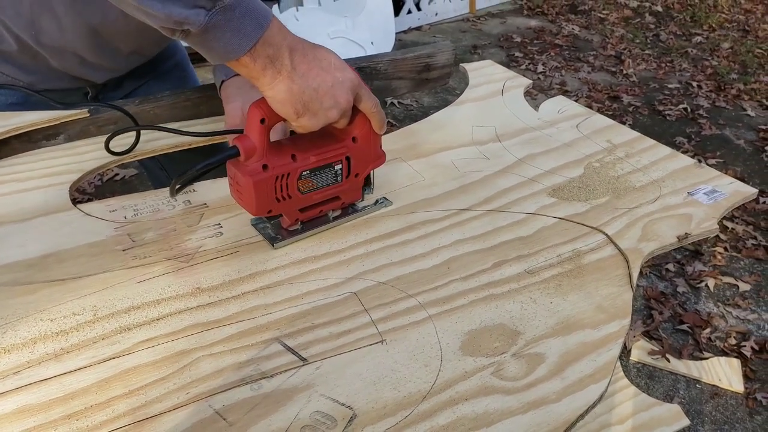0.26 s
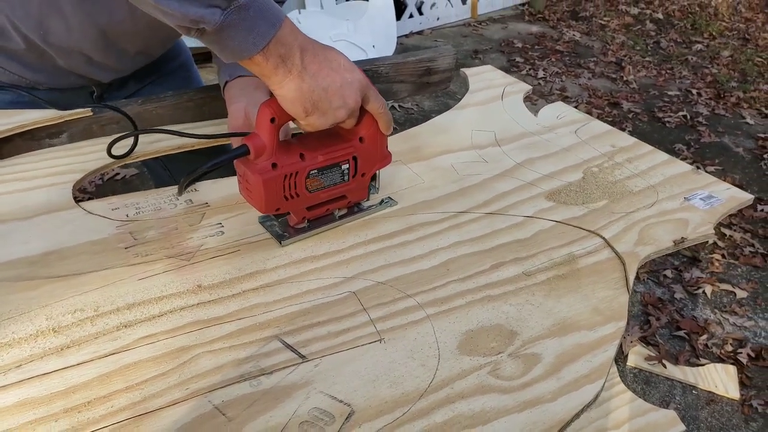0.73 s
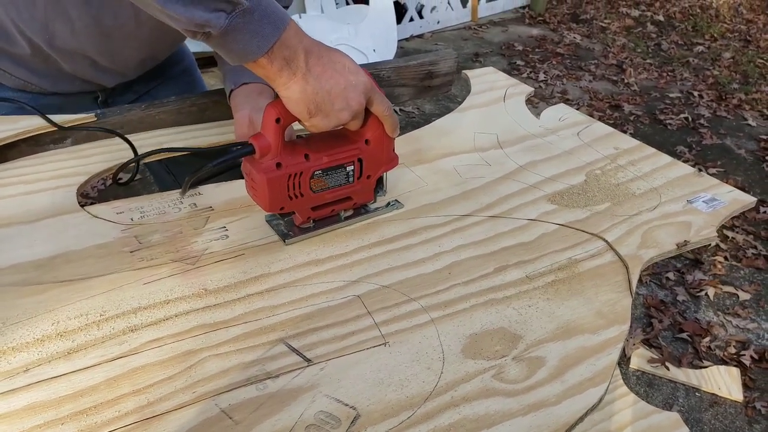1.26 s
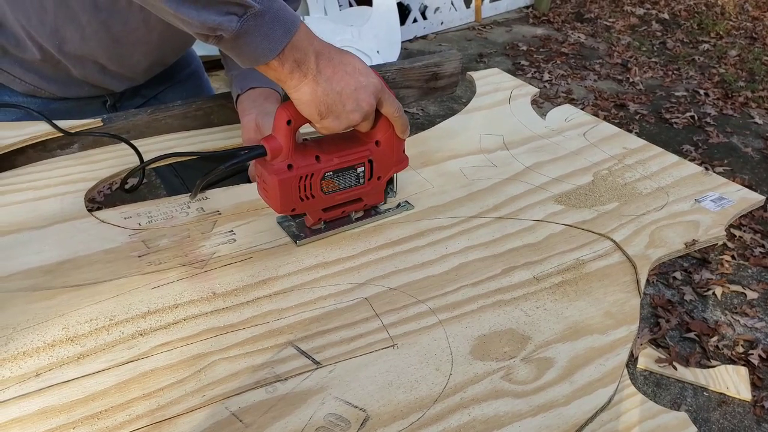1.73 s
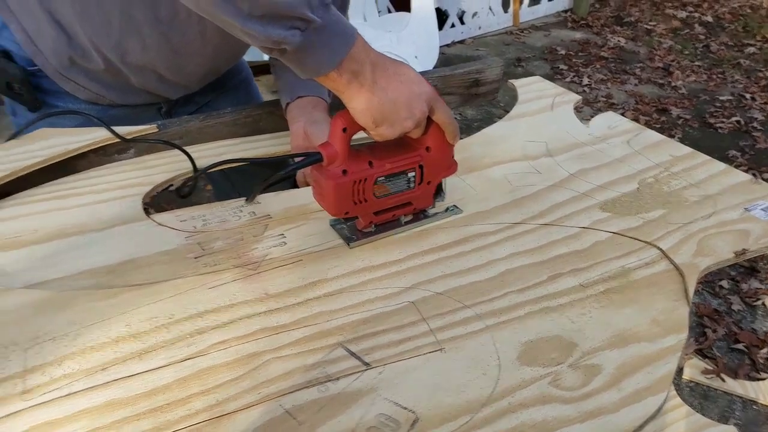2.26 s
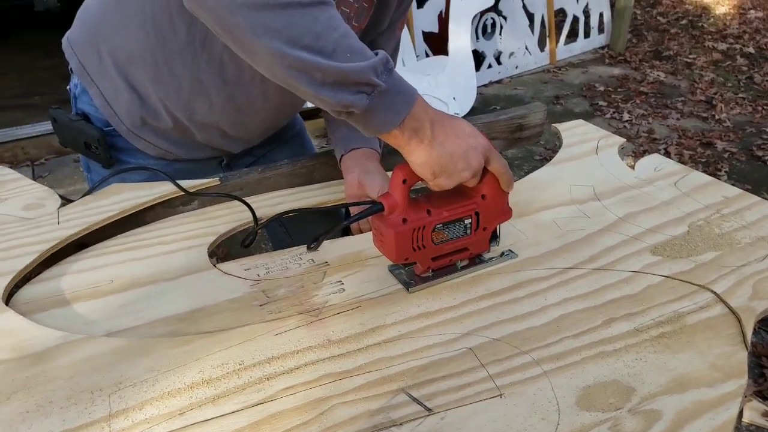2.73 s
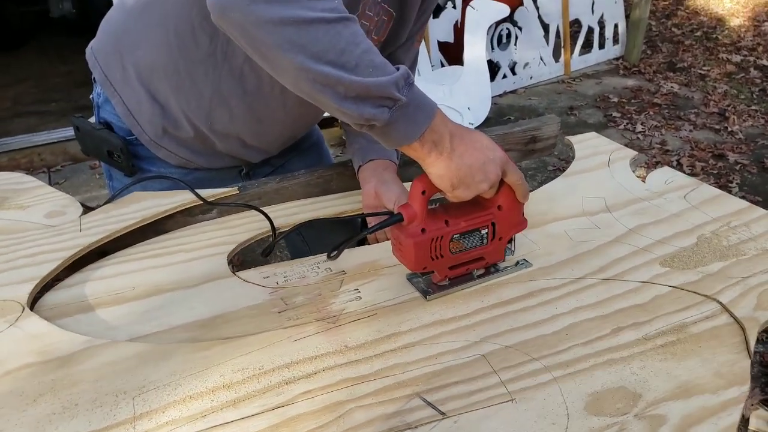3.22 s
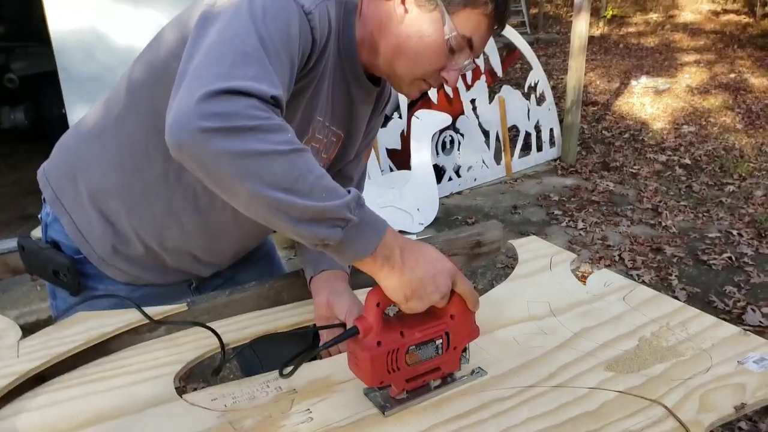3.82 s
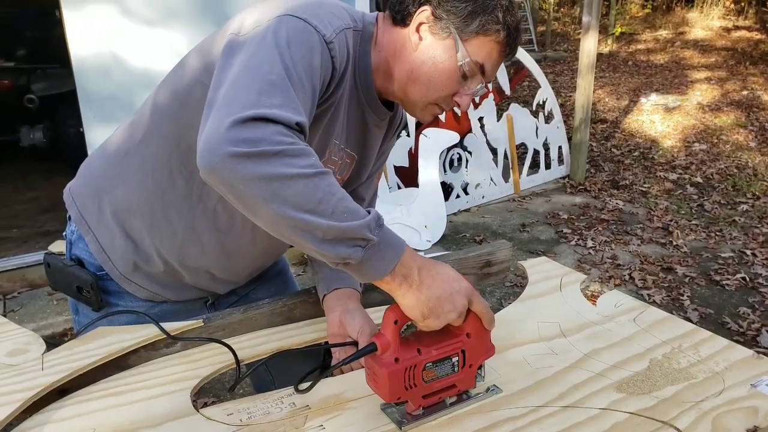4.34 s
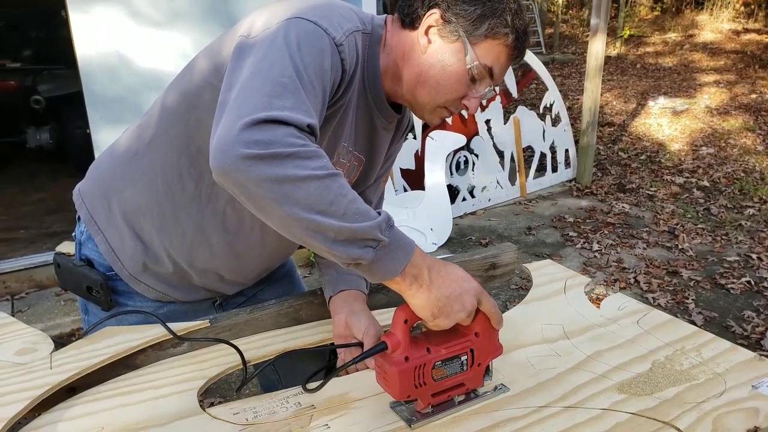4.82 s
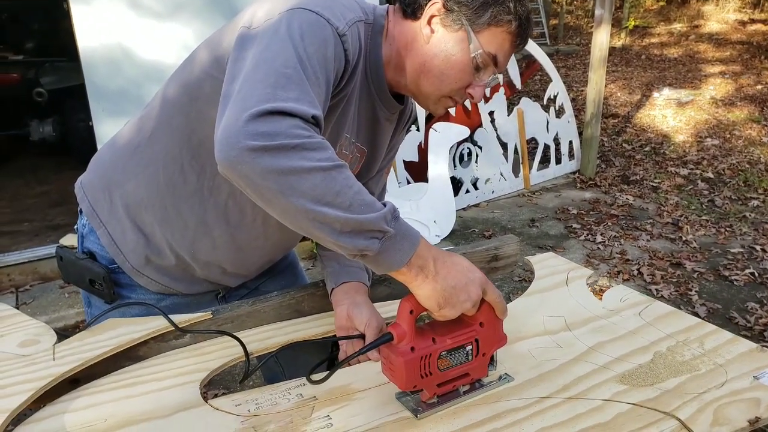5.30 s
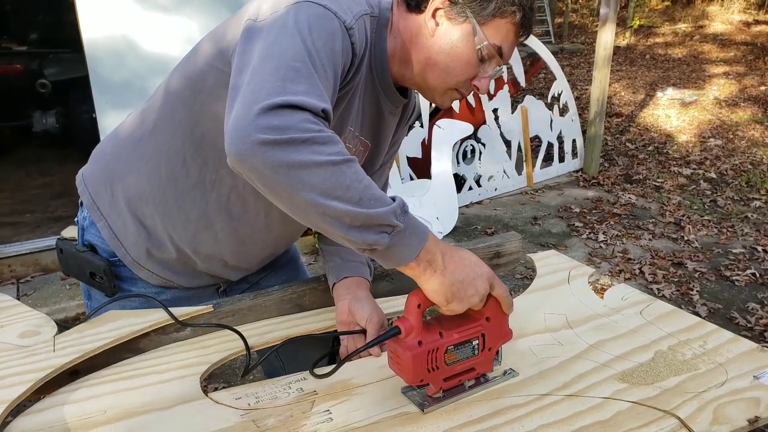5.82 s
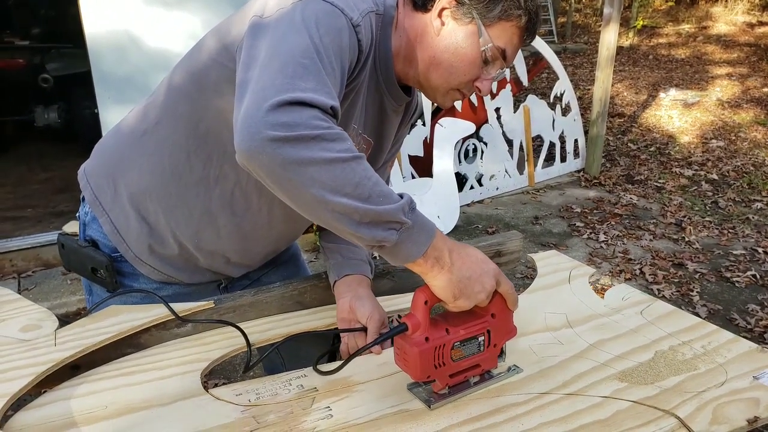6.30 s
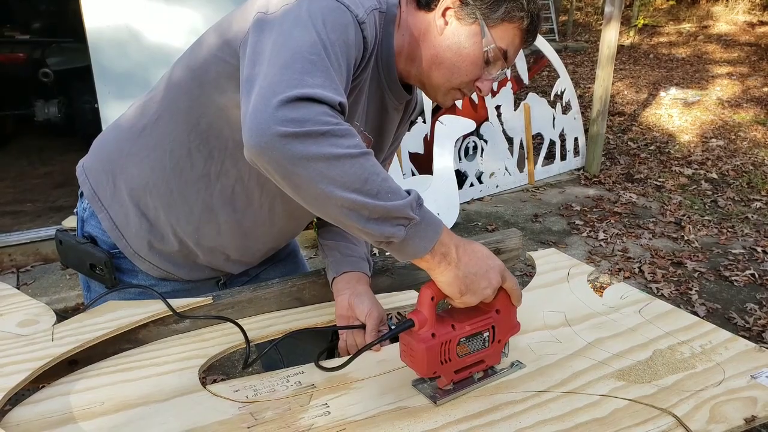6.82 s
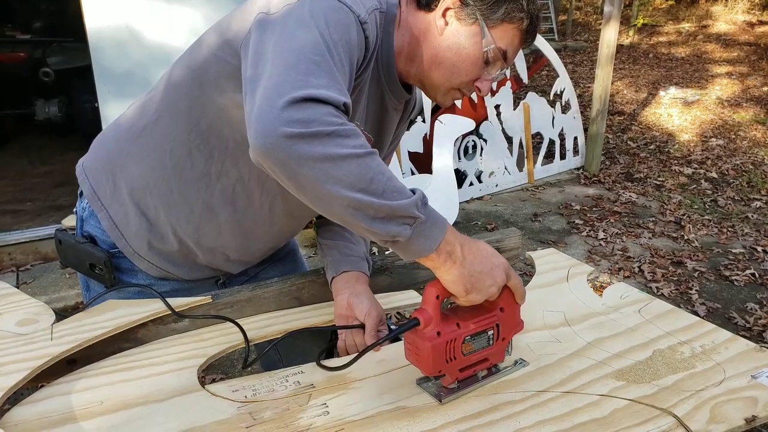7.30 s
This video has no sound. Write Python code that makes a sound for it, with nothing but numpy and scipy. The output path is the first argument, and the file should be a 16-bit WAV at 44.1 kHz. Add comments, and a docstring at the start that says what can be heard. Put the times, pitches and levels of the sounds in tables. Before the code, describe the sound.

Outdoors, close to a hand-held stereo microphone, a corded jigsaw is already cutting plywood. A steady motor and gear whine sits inside a rough, rapid rattling roar with bright fan hiss. At half a second the blade binds and the wooden sheet rumbles and slaps harder. After two seconds the sound shifts and drops a few decibels, then stays steady, with a milder bind near four seconds.

```python
"""A corded jigsaw cuts a plywood sheet outdoors, close to a hand-held camera.
From the start the motor shaft and crank gears whine, chips and blade knocks make the casing roar and
the plywood ring, the fan hisses and faint air puffs. At about 0.5 s the blade binds and the sheet rumbles.
After two seconds the camera swings away, shifting every layer's level or tone; near 3.8 s the blade binds
again, more gently. Tones are wavering cosines; the other sounds are mostly filtered noise."""
import sys
import numpy as np
from scipy import signal
from scipy.fft import rfft, irfft, next_fast_len
from scipy.io import wavfile
from scipy.ndimage import uniform_filter1d, map_coordinates

SR = 44100
rng = np.random.default_rng(int(sys.argv[2]) if len(sys.argv) > 2 else 0)


def dump_mix(stems):
    """Bounce the given channels to the path in sys.argv[1] as a 16-bit WAV at rate SR."""
    frames = np.atleast_2d(stems).T  # one column per channel
    limited = np.clip(frames, -1, 1)  # hard clip at full scale
    pcm = np.round(limited * 32767).astype(np.int16)
    wavfile.write(sys.argv[1], SR, pcm)


N = 332955

# "Near, swinging, far" are the three camera views. Levels are relative: layers may add an overall level.
# camera path: [t/s, view (0 near, 1 swinging, 2 far)]
VIEW = [(0, 0), (2.2, 0.15), (2.5, 0.95), (3.5, 1.25), (4.2, 2), (7.55, 2.013)]
# saw speed, sagging under load: [t/s, strokes per second]
STROKE_SPEED = [(0, 53.81), (.4, 53.77), (.72, 52.8), (.97, 52.95), (1.22, 53.68), (1.8, 53.88),
                (2.3, 53.81), (2.7, 53.62), (3.25, 53.17), (3.8, 52.46), (4.05, 52.4), (4.6, 53),
                (5.05, 53.2), (5.75, 53.02), (6.1, 53.13), (7.55, 53.48)]
# shared level of casing and fan: [t/s, level/dB]
LOUDNESS = [(0, -17), (.6, -16.5), (1.05, -17), (2.05, -16.5), (2.7, -19), (3.2, -21.5), (3.9, -21.5),
            (4.35, -23.5), (5, -21.5), (5.6, -21.5), (7.55, -21.5)]
# times when the blade binds: [start t/s, end t/s, grip at the start/dB]
BITES = [(0.51, 0.95, -1.5), (3.83, 4.225, -6.5)]

# motor whine: [shaft order, level near/dB, swinging/dB, far/dB, lift while binding/dB]
WHINE = [(1, -36.5, -38.5, -39.5, -0.5), (4, -23.5, -27, -31, -2), (8, -36, -27.5, -27, -4)]
# wavering tones in step with the slap: [stroke order, near/dB, swinging/dB, far/dB, lift while binding/dB]
CHATTER = [(5, -56.5, -64.5, -47, 19.5), (14, -43, -37.5, -36.5, 3), (15, -38, -40.5, -37.5, 0),
           (16, -66, -50, -44, -1), (19, -34, -42, -51.5, 5), (20, -44, -58, -61, -3),
           (21, -41, -37, -55, 2.5), (25, -60, -51, -54, 4)]
# other gear and stroke tones, wavering freely, where shaft order 5 is the gear mesh:
# [shaft order, stroke order to add]
TONE_ORDERS = [(0, 3), (0, 6), (0, 7), (0, 8), (0, 11), (0, 12), (0, 13), (0, 17), (0, 22), (0, 39),
               (1, -2), (1, -1), (1, 1), (1, 2), (1, 3), (1, 4), (1, 5), (2, 0), (2, 1), (3, 0), (5, -3),
               (5, -2), (5, -1), (5, 0), (5, 2), (5, 7), (6, -2), (6, 0), (12, 0)]
# one row per row of TONE_ORDERS: [level near/dB, swinging/dB, far/dB]
TONE_LEVELS = [(-44.5, -47.5, -47.5), (-73, -62, -51.5), (-50, -53.5, -52), (-59, -76, -68),
               (-41.5, -47, -52.5), (-58, -49, -52), (-38, -43, -64), (-46, -59, -51), (-56, -42, -47.5),
               (-33.5, -45, -45), (-57, -56, -59), (-48, -57, -63), (-44, -50, -60), (-49, -48, -83),
               (-60, -55, -75), (-42, -45, -66), (-34, -48, -44), (-36.5, -46, -46), (-37, -70, -49.5),
               (-39.5, -51, -38.5), (-31.5, -53, -40), (-62, -59, -37.5), (-37, -37, -64), (-35, -57, -90),
               (-35, -32, -50), (-49, -45, -46), (-35.5, -40, -36.5), (-40, -33, -37), (-46, -52, -45.5)]
# extra tones while the blade binds: [stroke order], and for each its [level/dB]
SHAKE_ORDERS = (2, 4, 6, 8, 22, 25)
SHAKE_LEVELS = [-47.5, -49, -46, -54, -38, -42]
# tones that swell or fade for a while: {nearest stroke order: [centre t/s, length/s, lift/dB]}
SWELLS = { 5: [(1.1, 0.22, 6), (3.35, 0.84, 9), (4.36, 0.37, -19)], 9: [(.12, 1.2, -4), (3.4, 1.3, -5.5),
          (4.36, 0.2, -6), (4.65, 1.5, -12), (5.8, 1.4, -0.5)], 7: [(1.15, 0.22, -3), (3.2, .45, -14),
          (4.87, 0.4, -9), (7.2, 0.97, -6)], 10: [(.7, .5, -9), (2.1, 1, 6.5)], 11: [(.2, 0.46, -10),
          (2.55, 0.46, 7), (3.4, 0.92, -19), (4.45, 0.43, 8.5)], 14: [(1.12, .22, -10), (1.76, .4, -8),
          (2.62, 0.2, -1), (3.65, 0.35, 3.5)], 15: [(.2, .65, -12), (.97, 0.35, 8.5), (3.55, 0.4, -6),
          (4.75, 0.79, 4.5), (5.52, 0.82, 11.5), (6.02, .45, 3.5)], 19: [(.45, .45, 2.3), (3.55, .8, 6.8),
          (4.6, 1.3, 4.2), (5.62, .4, 8.5)], 20: [(.2, 0.49, 8.1), (.76, 0.5, 11), (1.15, .3, 3.6),
          (2.12, .25, 4), (5.7, .4, 8)], 21: [(.8, 1.3, 10), (3.65, 0.55, -13), (5.1, 1.9, 7)],
          25: [(5.52, 0.49, 10), (6.62, .25, 9)], 37: [(2.55, 0.59, -4), (7.45, .7, -0.5)],
          74: [(.12, .55, 2.5), (2.02, .55, -6), (3.9, 0.74, -9)]}

# colour of the casing roar: [f/Hz, near/dB per Hz, swinging/dB per Hz, far/dB per Hz]
CASING_COLOUR = [ (130, -47, -32.5, -32.5), (238, -44, -30, -22.5), (295, -34, -29, -17.5),
                 (366, -25, -25, -16.5), (650, -11.5, -11.5, -17), (1190, -15.5, -19.5, -12.5),
                 (1620, -11, -10.5, -7.5), (1847, -9.5, -7, -5), (2080, -3.5, -3, -3), (3100, -8, -2.5, -3),
                 (3850, -8.5, -3.5, -4.5), (4130, -8, -14.5, -12.5), (4920, -12, -10.5, -11),
                 (5580, -14, -16, -14), (6700, -18.5, -17, -18), (10000, -29, -28, -35)]
# casing resonances: [f/Hz, width/Hz, lift near/dB, swinging/dB, far/dB]
CASING_MODES = [(1260, 126, 3, 12.3, 7.6), (1464, 84, 6.5, 6.5, 4.3), (3300, 280, 4.5, 0.89, 0.1),
                (3800, 550, -6.5, 1.4, 3.6), (5090, 260, -3, .1, 5.2)]
# two drifting bright bands, low in the casing and high in the fan: [t/s, low f/Hz, lift/dB, high f/Hz, lift/dB]
GLIDE = [ (0, 2300, 1.2, 10700, 2.4), (1, 2390, 5.4, 11000, 2.9), (2.2, 2470, 6.3, 12500, 5.2),
         (2.45, 2420, 3.2, 12000, 1), (3, 2550, 6.4, 12700, 1.9), (3.6, 2750, 3.7, 13000, 1.9),
         (4.2, 2880, 4.6, 12400, 0.77), (7.55, 3130, 1.8, 11800, 1.2)]
# bands of the casing roar that flare or sink for a moment: [centre t/s, length/s, f/Hz, width/Hz, lift/dB]
FLARES = [(2.35, 0.17, 2200, 1400, -2), (2.08, 0.36, 3340, 310, 2.5), (1.87, 0.12, 2900, 390, 6),
          (2.52, 0.094, 2480, 490, 7.5), (2.8, 0.28, 2650, 400, 2.5), (1.65, 0.35, 2800, 600, -2),
          (5.3, 0.84, 2650, 400, 1.5), (6.2, 0.061, 2850, 960, 2.5), (7.1, 0.3, 3100, 600, 2.5),
          (5.4, 0.15, 2800, 500, -0.5), (5.55, 0.51, 1300, 260, 4)]

# plywood modes: [f/Hz, width/Hz (widened when filtering), delay after the slap/ms, slap lift/dB]
SHEET_MODES = [(1087, 280, -0.45, -1.3), (793, 194, -0.4, 0), (1366, 190, 2.5, 3)]
# one row per plywood mode: [level near/dB, swinging/dB, far/dB]
SHEET_LEVELS = [(-24, -27, -37.5), (-34, -32, -26), (-41, -42, -36)]
# slaps given a set strength, strong or weak: [t/s, lift/dB]
SET_SLAPS = [(.041, 4), (.136, -6), (.265, 9), (.468, 12), (.502, 13), (.521, 12), (.54, 14), (.558, 2),
             (.672, 4), (.69, 12), (.709, 9), (.785, 1), (.804, 12), (.823, 0), (.86, 3), (.898, 14.5),
             (1.012, 12), (1.03, 14), (1.295, 0), (1.39, 10), (1.574, 10), (1.666, 5), (1.847, 7),
             (1.883, 2), (1.955, 6), (2.01, 11), (2.11, 11), (2.147, 8), (2.184, 6), (3.006, 6), (4.591, 8),
             (4.91, 6), (4.95, 8), (5.106, 7), (5.178, -1), (5.495, 9), (5.533, 10), (5.646, 10),
             (5.836, 4), (5.857, 8), (6.082, 6), (6.292, 7), (6.44, 7), (6.59, 2), (7.21, 4), (7.395, 9),
             (7.5, 11)]
# colour of the rumble while binding: [f/Hz, level/dB per Hz]
THUD = [(30, -30), (70, -21), (120, -2), (350, 5), (700, -21), (1500, -60)]

# colour of the fan hiss: [f/Hz, near/dB per Hz, swinging/dB per Hz, far/dB per Hz]
FAN_COLOUR = [ (4000, -55, -45, -42), (7320, -11.5, -2, -5), (8500, -2.5, 5.5, 5), (8900, -1, 2, 1.5),
              (10700, -2.5, 0, 2), (11600, 0.5, 1.5, 1.5), (13000, -2.5, 3, 1), (14500, -1, -7, -1),
              (15600, -4, -1, -9)]
# fan level added to LOUDNESS: [near/dB, swinging/dB, far/dB]
FAN_LEVELS = (-5.5, -8, -5.5)
# colour of the breeze: [f/Hz, level/dB per Hz]
GUST = [(20, -23), (60, -20), (100, -15.5), (140, -3), (220, -15), (600, -70)]
# level of the breeze: [near/dB, swinging/dB, far/dB]
BREEZE_LEVELS = (-50.5, -57, -56.5)
# puffs of breeze: [centre t/s, length/s, lift/dB]
PUFFS = [(.25, .5, 4), (.7, 0.29, 4), (1.104, .1, 6), (1.983, 0.26, 4), (2.206, .1, 11), (2.4, 0.14, 7),
         (2.94, .08, 6), (3.85, .2, 9), (5.45, .1, 8)]

# the two sound ports: [f/Hz, left over right near/dB, far/dB, likeness near (0-1), far (0-1)]
PORTS = [ (60, 16, -6, 0.56, 0.28), (160, 1.5, 1, 0.95, 0.43), (760, -2.5, -3, 0.76, 0.57),
         (1060, -3, -2, 1, 0.49), (1790, -1.5, -0.5, 0.13, 0.26), (2090, -2, -0.5, 0.41, 0.55),
         (3100, -1, -3.5, 0.23, 0.94), (3710, -8.5, -3, 0.18, 0.75), (4100, -2.5, -11.5, 0.45, 0.091),
         (4860, -4.5, -7, 0.072, 0.63), (7340, -4, -7, 0.046, 0.13), (9100, -1.5, 0, 0.31, 0.33),
         (11500, -2.5, -3, 0.45, 0.28), (15000, -1, 0, 0.99, 0.27)]
# how far the left port leads the right, near and then far: [f/Hz, lead/rad]
LEAD_NEAR = [(0, 0.5), (1000, 0.46), (1600, 1.5), (2000, 0.86), (2600, 1.73), (3300, 0.5), (4000, -1.1),
             (5000, 3), (9000, -1), (15000, 3)]
LEAD_FAR = [(0, 1), (1400, -0.66), (2000, -1.81), (3000, -2), (4000, -3), (4700, -8.5), (5100, -8.5),
            (7500, -7), (9000, -8.5), (12000, -10.5), (15000, -11.5)]

GEAR = 46 / 5  # shaft turns per stroke: 46-tooth crank gear over five-tooth pinion
FLUTTER_DB = 0.5  # fast whine flutter at shaft order 1; higher orders flutter more
SLAP_LEAD = 0.052  # chatter leads the whole stroke by this share of a stroke
KNOCK_AT, SECOND_HARDER_DB = .06, 1.6  # first knock (share of a stroke), extra strength of the second
MID_KNOCK = .35  # size of the lighter tick as the crank passes mid travel
SHEET_BIND_DB = 0.5  # binding rings the sheet harder
FRAME = 1024  # samples per filter frame
PATCH_BINS, PATCH_FRAMES = 4, 3  # patches of uneven level: about 170 Hz by 35 ms
TOP_HZ = 15730  # upper band limit of the input


def amp(db):
    """Turn dB into an amplitude factor."""
    return 10 ** (np.asarray(db) / 20)


def unit(x):
    """Scale a signal to rms 1."""
    return x / np.sqrt(np.mean(x ** 2) + 1e-20)


def curves(rows, t=None):
    """One value per sample (or per time in t) for each column after the time."""
    s, *cols = np.transpose(rows)
    t = np.arange(N) / SR if t is None else t
    return [np.interp(t, s, c) for c in cols]


def wobble(rate):
    """A smooth random curve with rate knots a second."""
    coarse = np.arange(0, N + 64, 64)
    knots = rng.standard_normal(int(N * rate / SR) + 4)
    return np.interp(np.arange(N), coarse, map_coordinates(knots, [coarse * rate / SR]))


def hump(centre_s, length_s, t=None):
    """A smooth rise and fall of height 1."""
    t = np.arange(N) / SR if t is None else t
    return np.exp(-(2 * (t - centre_s) / length_s) ** 2)


def bump(hz, centre_hz, width_hz):
    """A resonance bell of height 1 on the frequency grid."""
    return 1 / (1 + (2 * np.subtract.outer(hz, centre_hz) / width_hz) ** 2)


def by_view(values, view):
    """Blend one value (or column) per camera view."""
    share = [np.clip(1 - np.abs(view - k), 0, 1) for k in range(len(values))]
    return sum(np.multiply.outer(v, s) for v, s in zip(values, share))


def on_log(rows, hz):
    """Read each column after the frequency on a log frequency axis."""
    f, *cols = np.transpose(rows)
    return [np.interp(np.log(hz + 1), np.log(f), c) for c in cols]


def heard(pair, colour, patchy_db=0):
    """Colour a source and its scattered twin, then mix them at both ports as the view dictates."""
    hz, t, (direct, stray) = signal.stft(pair, SR, nperseg=FRAME)
    view = curves(VIEW, t)[0]
    far = np.clip(view, 0, 1)
    patches = uniform_filter1d(rng.standard_normal(direct.shape), size=PATCH_BINS, axis=0)
    patches = uniform_filter1d(patches, size=PATCH_FRAMES, axis=1)
    gain = colour(hz, view, t) * amp(patchy_db * unit(patches))
    tilt_near, tilt_far, alike_near, alike_far = on_log(PORTS, hz)
    # the less alike the ports, the more of the twin goes in with opposite signs
    turn = np.arccos(np.clip(by_view([alike_near, alike_far], far), 0, 1)) / 2
    lead_near = np.interp(hz, *np.transpose(LEAD_NEAR))
    lead_far = np.interp(hz, *np.transpose(LEAD_FAR))
    lead = by_view([lead_near, lead_far], far)
    # half of each level and phase difference goes to each port
    ear = amp(by_view([tilt_near, tilt_far], far) / 2) * np.exp(.5j * lead)
    mid = gain * np.cos(turn) * direct
    side = gain * np.sin(turn) * stray
    ports = np.array([(mid + side) * ear, (mid - side) / ear])
    return signal.istft(ports, SR, nperseg=FRAME)[1][:, :N]


def tone(stroke, order, db, waver_db, blur, start=None):
    """One order of the stroke, wavering in level and phase; start in turns, else random."""
    chance = rng.random()
    start = chance if start is None else start
    phase = 2 * np.pi * (order * stroke + start) + blur * wobble(6)
    return np.sqrt(2) * amp(db + waver_db * np.tanh(wobble(11))) * np.cos(phase)


def tone_db(order, near_db, swing_db, far_db, bind_db):
    """Level of one order: set by the view, changed by binding and by its own swells."""
    t = np.arange(0, N + 128, 128) / SR
    swell_db = sum(db * hump(s, length, t) for s, length, db in SWELLS.get(round(order), []))
    view_db = by_view([near_db, swing_db, far_db], curves(VIEW, t)[0])
    return np.interp(np.arange(N) / SR, t, view_db + bind_db * binding(t) + swell_db)


def gears(stroke):
    """Turning shaft, meshing teeth and crank give tones at multiples of their rates; binding adds more."""
    x = np.zeros(N)
    for shaft, *db in WHINE:
        order = shaft * GEAR
        flutter_db = FLUTTER_DB * shaft ** 0.79 * wobble(55)
        x = x + tone(stroke, order, tone_db(order, *db) + flutter_db, waver_db=0.8, blur=0.53)
    for order, *db in CHATTER:
        x = x + tone(stroke + SLAP_LEAD, order, tone_db(order, *db), waver_db=3, blur=0.55, start=0)
    for (shaft, crank), db in zip(TONE_ORDERS, TONE_LEVELS):
        order = shaft * GEAR + crank
        level_db = tone_db(order, *db, bind_db=-1.0)
        # speed jitter blurs higher orders more
        x = x + tone(stroke, order, level_db, waver_db=3.5, blur=0.71 + 0.016 * order)
    for order, db in zip(SHAKE_ORDERS, SHAKE_LEVELS):
        x = x + binding() * tone(stroke, order, db, waver_db=3.5, blur=0.4)
    return amp(0.3) * heard(np.array([x, 0 * x]), lambda hz, view, t: 1)


def reversals(stroke, scatter_db, fall):
    """The blade holder knocks at each end of its travel: sudden rise, uneven size, harder at one end."""
    half = 2 * (stroke + 1 - KNOCK_AT)  # counts half strokes
    turn = half.astype(int)
    count = turn[-1] + 1
    size = amp(scatter_db * rng.standard_normal(count) + SECOND_HARDER_DB * (np.arange(count) % 2))
    return size[turn] * np.exp(-(half - turn) / fall)


def chips(stroke, knock, spiky_db, shaft_db):
    """Teeth tear chips: noise with uneven spikes that beats with the shaft, with the knocks on top."""
    beat_db = shaft_db * np.cos(2 * np.pi * GEAR * stroke)
    size = uniform_filter1d(rng.standard_normal(N), size=40)  # both paths carry the same chips
    return (1 + knock) * amp(beat_db + spiky_db * unit(size)) * rng.standard_normal((2, N))


def casing(stroke, knock):
    """The housing roars as chips and knocks shake it, coloured by its resonances."""
    def colour(hz, view, t):
        glide_hz, glide_db = curves(GLIDE, t)[:2]
        modes_db = sum(np.outer(bump(hz, c, w), by_view(db, view)) for c, w, *db in CASING_MODES)
        flare_db = sum(np.outer(bump(hz, c, w), db * hump(s, length, t)) for s, length, c, w, db in FLARES)
        drift_db = glide_db * bump(hz, glide_hz, width_hz=340)
        return amp(by_view(on_log(CASING_COLOUR, hz), view) + modes_db + flare_db + drift_db)
    level = amp(1.0 + curves(LOUDNESS)[0] + 0.24 * wobble(13))
    drive = chips(stroke, 1.9 * knock, spiky_db=0.9, shaft_db=0.1)
    return level * unit(heard(drive, colour, patchy_db=2.2))


def slaps(stroke):
    """The shoe slaps the sheet once a stroke, unevenly, harder while the blade binds."""
    uneven = stroke + .015 * wobble(30)
    at = np.flatnonzero(np.diff(uneven.astype(int)) > 0)
    size_db = 24 + 4 * rng.standard_normal(N)[at]
    for s, db in SET_SLAPS:
        size_db[np.argmin(np.abs(at - s * SR))] = 27.5 + db  # the slap nearest that time
    x = np.zeros(N)
    x[at] = amp(size_db) * (0.5 + 0.21 * binding()[at])
    return x


def sheet(stroke, knock):
    """Each plywood mode rings in bursts as the teeth tear and the shoe slaps."""
    out, slap = 0, slaps(stroke)
    for (centre, width, late_ms, slap_db), db in zip(SHEET_MODES, SHEET_LEVELS):
        def colour(hz, view, t):
            # a small panel radiates little below its mode
            weak_below = np.minimum(hz[:, None] / centre, 1) ** 2.6
            return bump(hz, [centre], 1.43 * width) ** 1.75 * weak_below
        tearing = unit(chips(stroke, 0.74 * knock, spiky_db=1.5, shaft_db=-0.5))
        late_slap = amp(slap_db) * np.roll(slap, round(late_ms * SR / 1e3))
        ring = heard(tearing + late_slap, colour)
        level_db = by_view(db, curves(VIEW)[0]) - 4.0 + SHEET_BIND_DB * binding()
        unsteady_db = 0.66 * wobble(9.2) + 0.62 * wobble(19)
        out = out + amp(level_db + unsteady_db) * unit(ring)
    return out


def fan(stroke, knock):
    """Cooling air and brushes hiss: bright noise, rough with the chips and knocks."""
    def colour(hz, view, t):
        glide_hz, glide_db = curves(GLIDE, t)[2:]
        drift_db = glide_db * bump(hz, glide_hz, width_hz=1300)
        return amp(by_view(on_log(FAN_COLOUR, hz), view) + drift_db)
    drive = chips(stroke, 0.35 * knock, spiky_db=1.06, shaft_db=0.3)
    air = heard(drive, colour, patchy_db=2.0)
    level_db = by_view(FAN_LEVELS, curves(VIEW)[0]) + curves(LOUDNESS)[0]
    return amp(level_db + 0.25 * wobble(9)) * unit(air)


def breeze():
    """Faint lumps of moving air press on the ports: low noise, swelling unevenly and in puffs."""
    m = next_fast_len(N)
    colour = amp(on_log(GUST, np.fft.rfftfreq(m, 1 / SR))[0])
    low = irfft(rfft(rng.standard_normal((2, N)), m) * colour, m)[:, :N]
    puff_db = sum(db * hump(s, length) for s, length, db in PUFFS)
    level_db = by_view(BREEZE_LEVELS, curves(VIEW)[0]) + puff_db
    lumps = amp(4.6 * wobble(17) + 1.5 * wobble(3.66))
    return amp(level_db) * unit(lumps * (low + 0.4 * low[::-1]))  # each port shares some of the other


def binding(t=None):
    """0-1 grip of the cut on the blade: sudden start, slow easing, then a quick release."""
    t = np.arange(N) / SR if t is None else t
    grip = 0
    for start, end, db in BITES:
        rise = np.clip((t - start) / 0.022, 0, 1)
        release = np.clip((end - t) / 0.077 + 1, 0, 1)
        grip = grip + amp(db) * rise * release * amp(-6 * (t - start))  # eases by 6 dB a second
    return grip


def shudder():
    """The sheet rumbles on its supports while the blade binds: low noise that follows the grip."""
    def colour(hz, view, t):
        return amp(on_log(THUD, hz)[0])[:, None]
    return amp(-38.5) * binding() * unit(heard(rng.standard_normal((2, N)), colour))


def scene():
    """Count the strokes, make the knocks and add up all the sources."""
    stroke = np.cumsum(curves(STROKE_SPEED)[0]) / SR
    end_knock = reversals(stroke, scatter_db=1.5, fall=0.18)
    mid_knock = MID_KNOCK * reversals(stroke + .25, scatter_db=2, fall=0.18)
    knock = end_knock + mid_knock
    machine = gears(stroke) + casing(stroke, knock) + sheet(stroke, knock) + fan(stroke, knock)
    return machine + breeze() + shudder()


def record(dry):
    """The input rounds off the highest peaks, weakens deep bass and keeps nothing above its band limit."""
    soft = dry / (1 + np.abs(dry / .95) ** 6) ** (1 / 6)
    m = next_fast_len(N + SR // 10)
    hz = np.fft.rfftfreq(m, 1 / SR)
    bass_cut = 1 / (1 + (70 / (hz + 1)) ** 2)
    return irfft(rfft(soft, m) * (hz < TOP_HZ) * bass_cut, m)[:, :N]


dry = scene()
out = record(dry)
dump_mix(out)
```